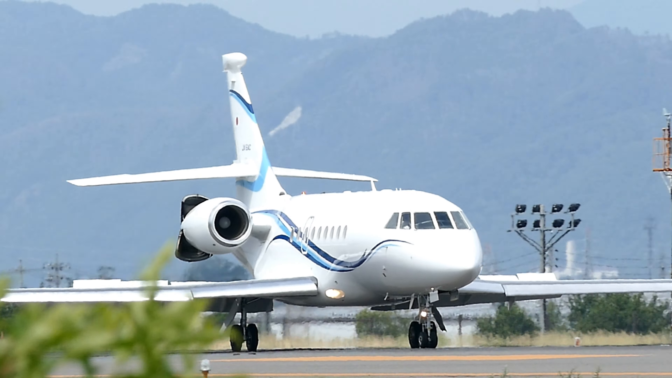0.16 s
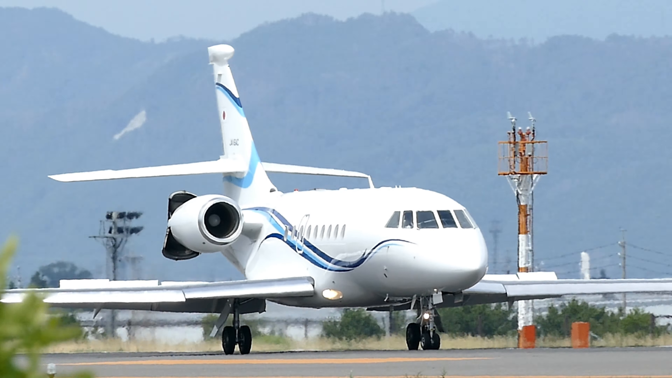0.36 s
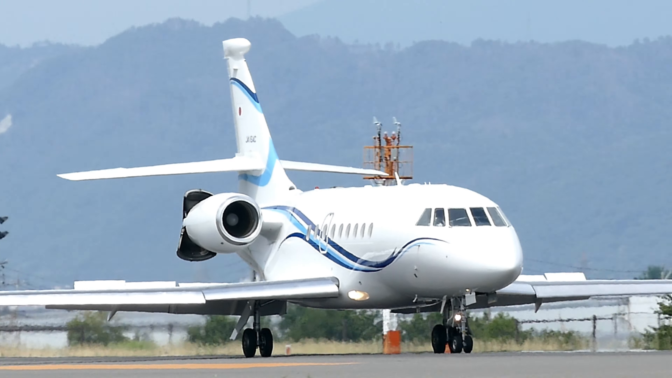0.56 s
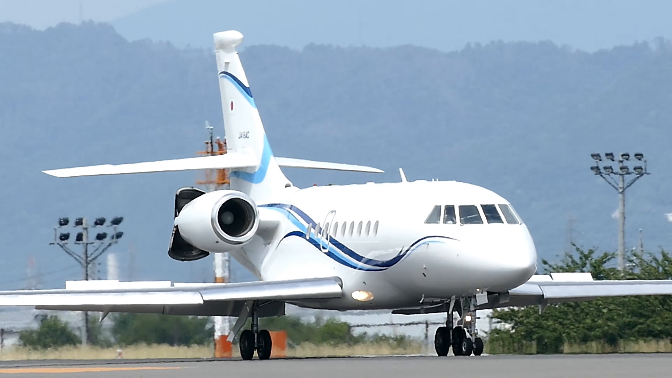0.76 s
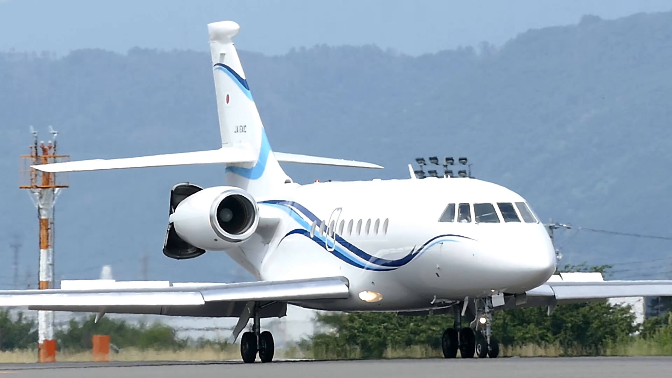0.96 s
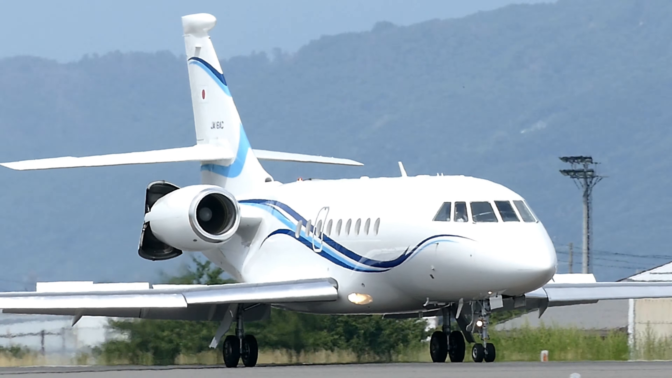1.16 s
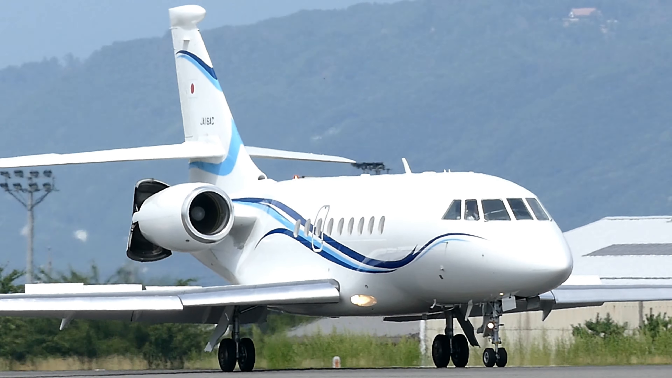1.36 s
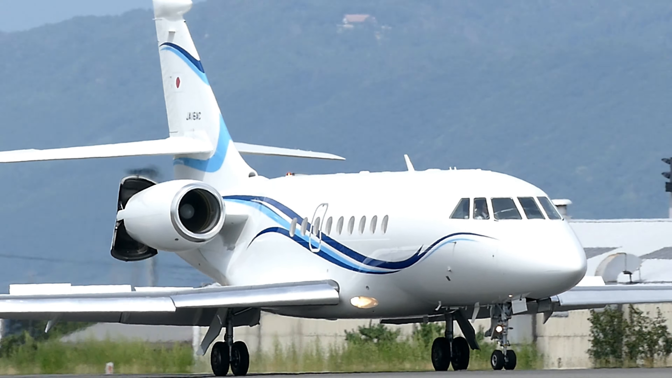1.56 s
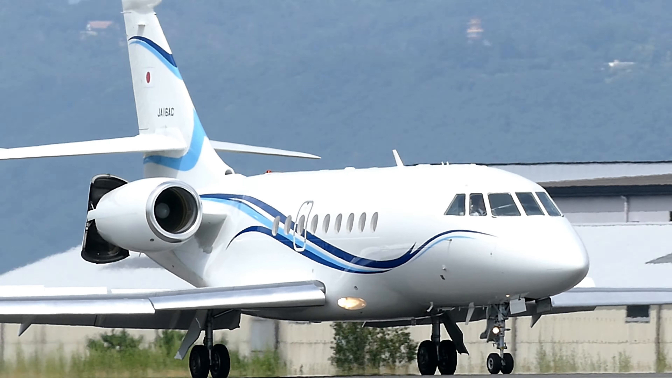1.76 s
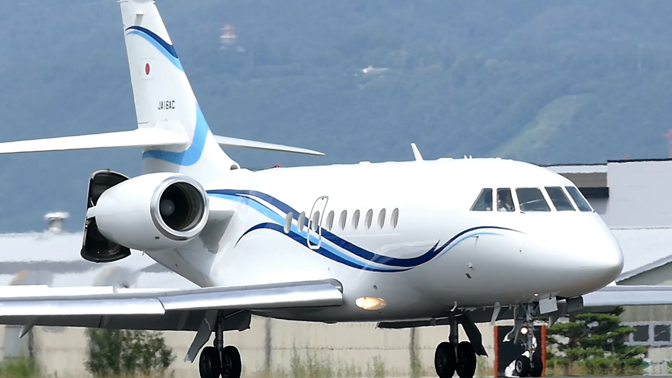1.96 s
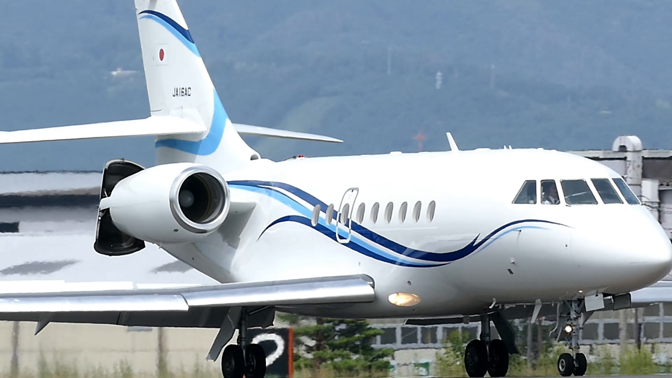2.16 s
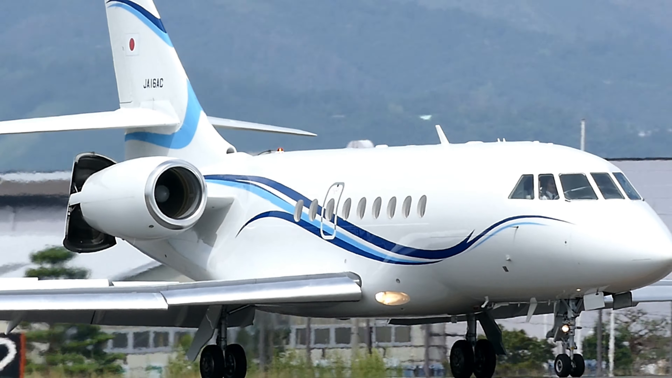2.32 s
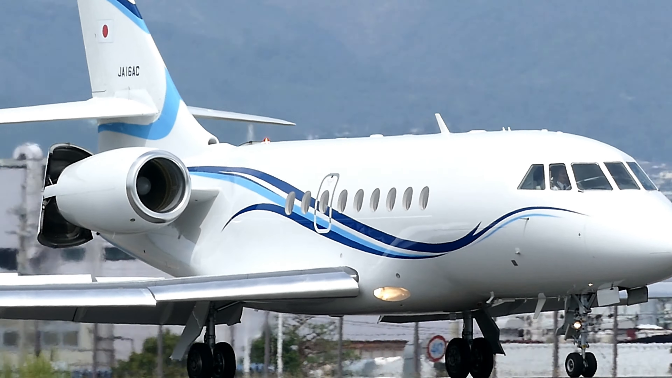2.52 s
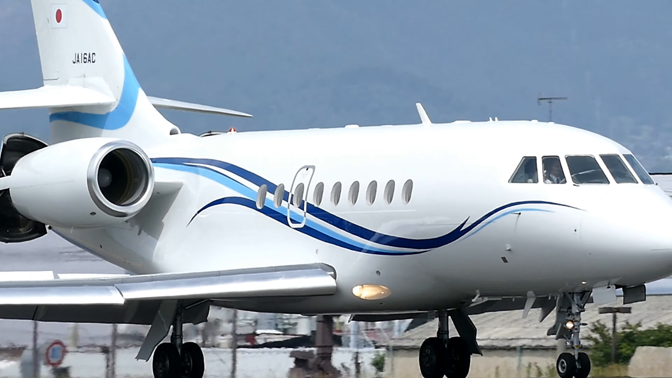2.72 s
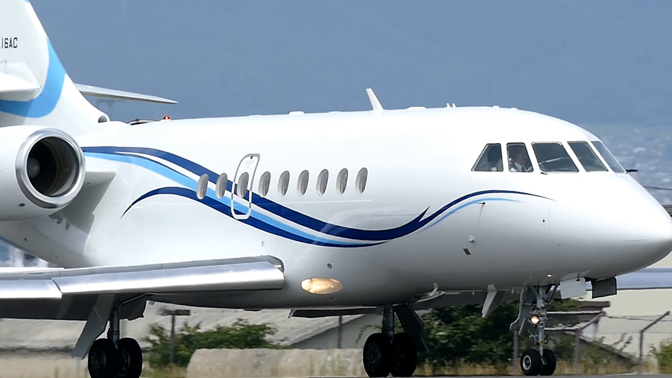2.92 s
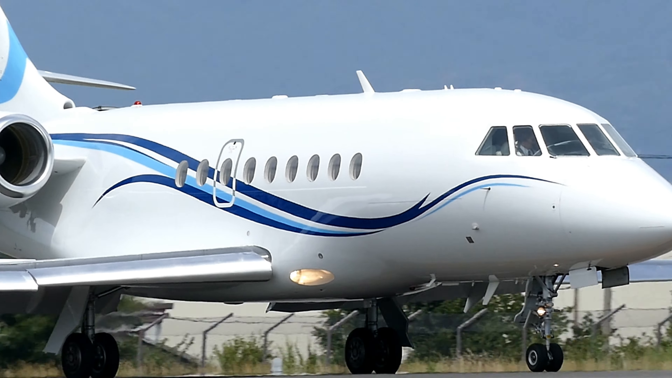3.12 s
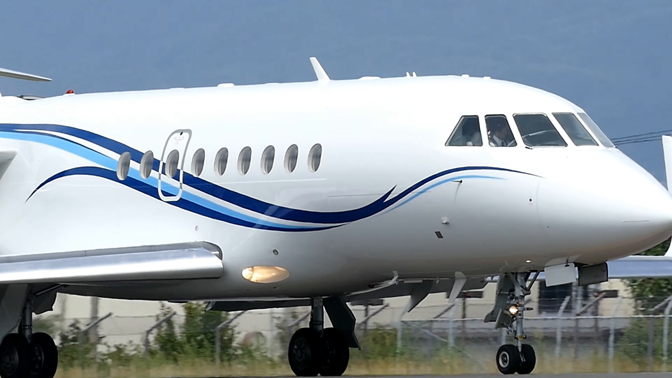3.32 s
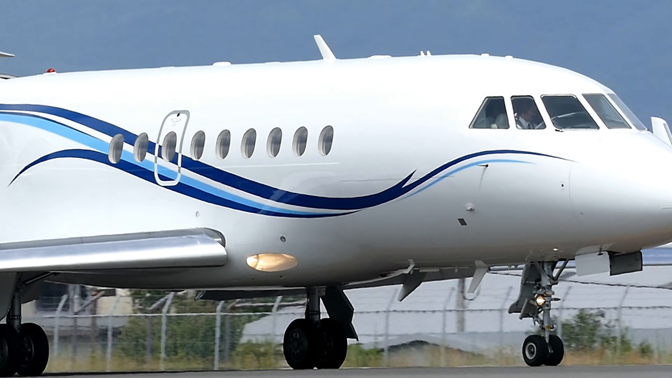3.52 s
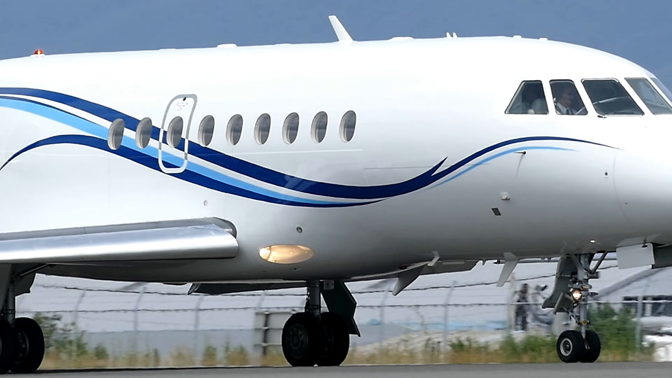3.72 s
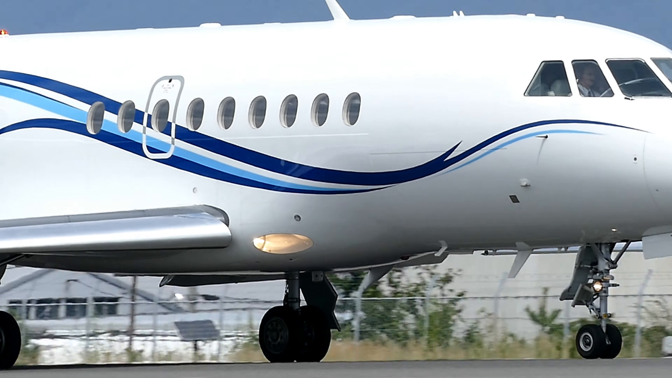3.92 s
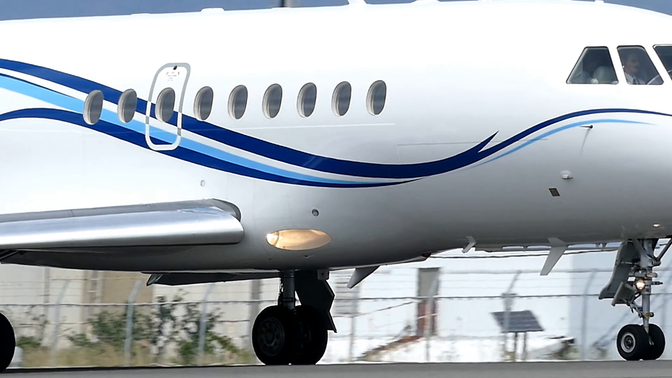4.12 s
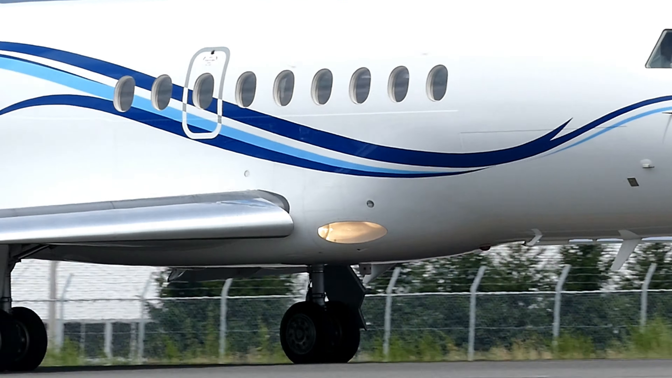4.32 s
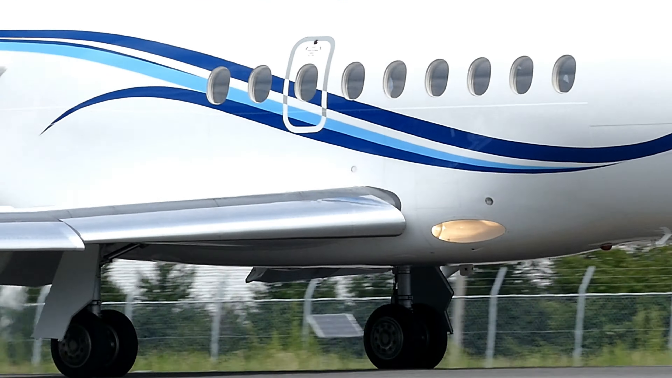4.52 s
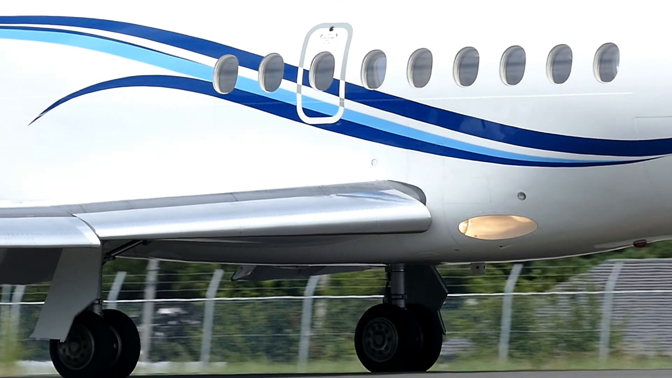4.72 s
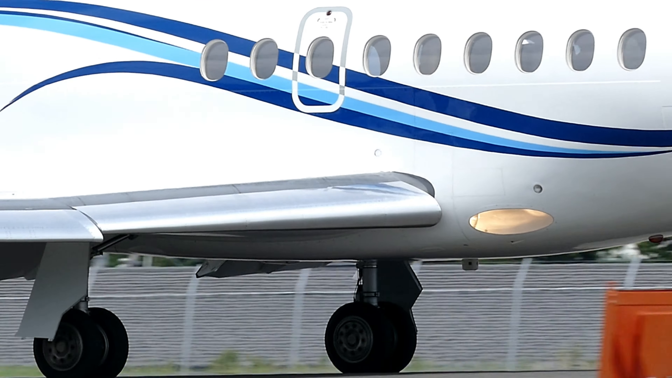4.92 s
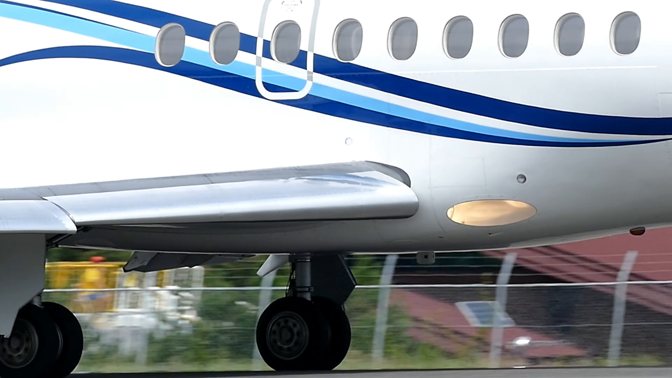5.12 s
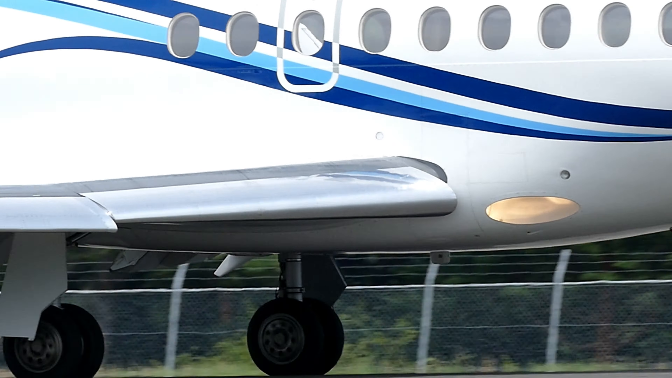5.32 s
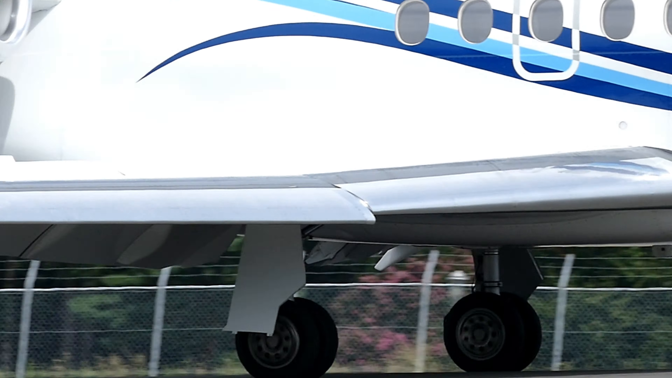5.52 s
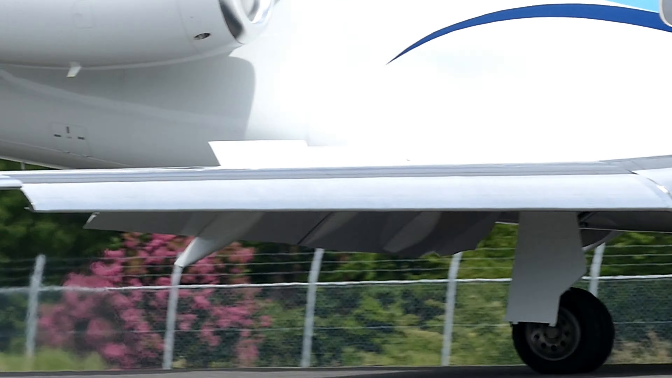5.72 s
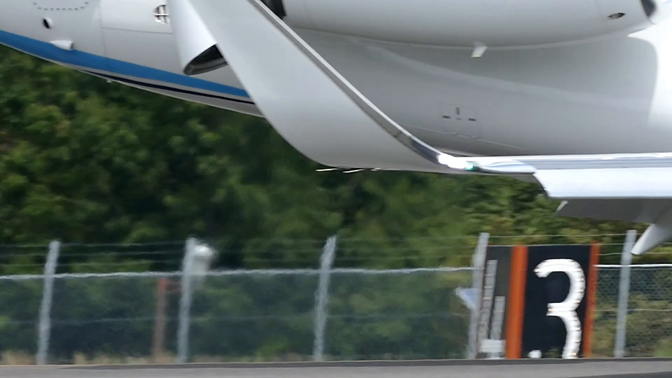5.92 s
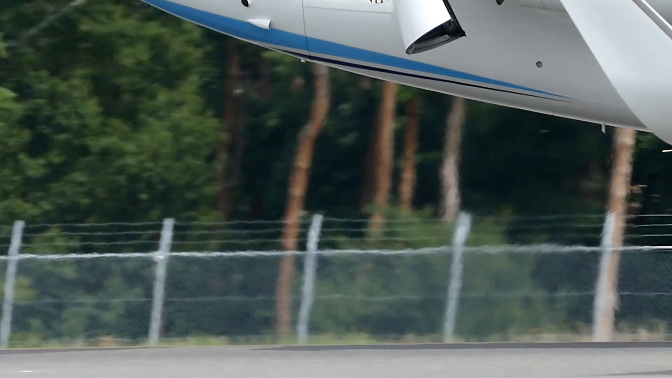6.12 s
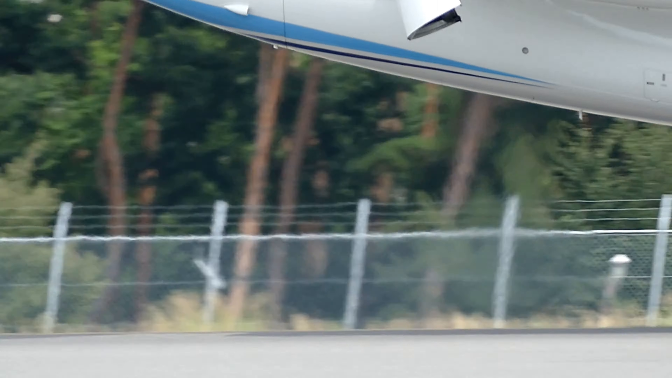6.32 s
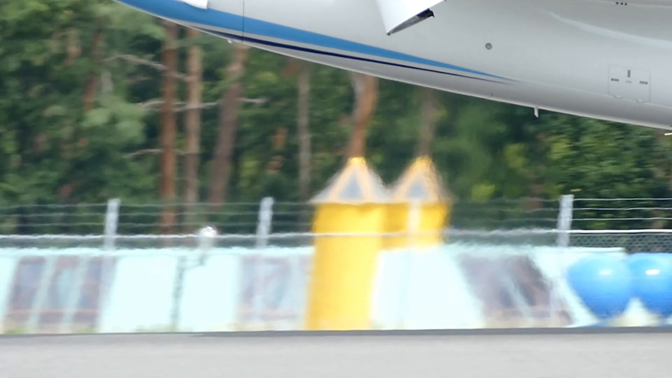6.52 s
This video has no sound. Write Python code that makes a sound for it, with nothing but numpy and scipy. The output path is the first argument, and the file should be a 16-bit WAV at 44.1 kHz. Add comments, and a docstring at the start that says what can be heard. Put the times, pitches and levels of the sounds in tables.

```python
"""First a distant airfield rumble, thin fan tones and a faint bird, heard from beside the runway.
Then the roar of a twin-engine jet, braking with reverse thrust as it rolls towards the camera: its exhaust
is thrown forward and swells in gusts as it nears. Ground and close surfaces echo differently into the two
microphone ports, and the recorder overloads at the loudest swells."""
import sys
import numpy as np
from scipy import signal
from scipy.fft import rfft, irfft, next_fast_len
from scipy.io import wavfile
from scipy.ndimage import uniform_filter1d, map_coordinates

SR = 44100
rng = np.random.default_rng(int(sys.argv[2]) if len(sys.argv) > 2 else 0)


def master(y):
    """Save y as 16-bit WAV."""
    cut = np.clip(np.atleast_2d(y).T, -1, 1)
    pcm = np.round(cut * 32767)  # scale
    wavfile.write(sys.argv[1], SR, pcm.astype(np.int16))


N = 294147
TIME = np.arange(N) / SR


def amp(db):
    """Decibels to gain."""
    return 10 ** (np.asarray(db) / 20)


def unit(x):
    """Scaled to rms 1."""
    return x / np.sqrt(np.mean(x ** 2) + 1e-20)


def gain_at(spectrum, hz):
    """Gain along (f/Hz, level/dB) points on a log frequency axis."""
    f, db = np.transpose(spectrum)
    return amp(np.interp(np.log(hz + 1), np.log(f + 1), db))


def curves(rows):
    """One value per sample for each column after t/s."""
    times, *columns = np.transpose(rows)
    return [np.interp(TIME, times, column) for column in columns]


def bumps(rows, steepness=2.56):
    """Smooth rises in dB around each row's moment, one curve for each column of rises."""
    t = np.arange(0, N / SR, 1 / 500)
    rises = sum(np.outer(db, np.exp(-np.abs((t - at) / half) ** steepness)) for at, half, *db in rows)
    return np.array(curves(np.transpose([t, *rises])))


def wobble(rate):
    """A smooth random curve, rate knots a second."""
    return map_coordinates(rng.standard_normal(int(N * rate / SR) + 4), [TIME * rate])


def filtered(x, response):
    """x times a complex response of frequency."""
    size = next_fast_len(N + 8192)
    return irfft(rfft(x, size) * response(np.fft.rfftfreq(size, 1 / SR)), size)[..., :N]


# Spectrum of the far surroundings: f/Hz, relative level/dB
AIRFIELD_SPECTRUM = [(25, -21), (50, 3), (120, -9), (300, -3.5), (500, -4.5), (1000, -8), (2000, -13.5),
                     (4000, -23), (7000, -32), (16000, -65)]

def airfield():
    """Distant steady rumble, alike at both microphone ports only in the bass."""
    shared, *own = rng.standard_normal((3, N))
    bass_share = lambda hz: 1 / (1 + (hz / 220) ** 4)
    bass = filtered(shared, lambda hz: gain_at(AIRFIELD_SPECTRUM, hz) * np.sqrt(bass_share(hz)))
    rest = filtered(np.array(own), lambda hz: gain_at(AIRFIELD_SPECTRUM, hz) * np.sqrt(1 - bass_share(hz)))
    return amp(-51) * unit(bass + rest) * amp([[.8], [-.8]])


# Notes of a far bird: t/s, f/Hz, length/s, peak level/dB
BIRD_NOTES = [(.39, 3550, .04, -58), (.423, 4200, .025, -61)]

def bird():
    """Short soft notes, barely above the distant noise."""
    return sum(amp(db) * np.exp(-8 * ((TIME - at) / length) ** 2) * np.sin(2 * np.pi * hz * TIME)
               for at, hz, length, db in BIRD_NOTES)


def blade_tones(hz, db, apart_hz, weaker_db, waver_hz, flutter_db, ports_db):
    """One blade tone from each engine; a little apart, they beat, and moving air makes them waver."""
    db = db - 60 * np.clip(TIME - 4.4, 0, 2)  # fades from 4.4 s, as the roar takes over
    pair = 0
    for shift_hz, engine_db in [(0, 0), (apart_hz, weaker_db)]:
        phase = 2 * np.pi * np.cumsum(hz + shift_hz + waver_hz * wobble(30)) / SR
        gain = amp(db + engine_db + flutter_db * wobble(16))
        pair = pair + gain * np.sin(phase + [[0], [1.9]])  # out of step at the two ports
    return np.sqrt(2) * pair * amp(ports_db)


def whine():
    """The engines' higher blade tone, loudest at 3.4 s and fading either side."""
    db = -60 - 5.5 * np.abs(TIME - 3.4)
    return blade_tones(3815, db, apart_hz=-18, weaker_db=-6, waver_hz=12, flutter_db=3, ports_db=[[0], [2]])


# Brief flares of the fan tone at the microphone: t/s, half length/s, rise/dB
FAN_FLARES = [(.14, .06, 6), (.65, .05, 2), (.84, .1, 7), (1.27, 0.11, 8), (1.5, 0.087, 7), (2.42, 0.09, 5),
              (2.9, .15, -1), (3.6, 0.93, 7), (4.3, .4, 10)]

def fan():
    """The fans from down the runway, sinking in pitch and growing louder."""
    hz = 2212 - 89 * TIME
    db = -63 + 1.8 * TIME + bumps(FAN_FLARES)[0]
    return blade_tones(hz, db, apart_hz=24.15, weaker_db=-1.5, waver_hz=6.95, flutter_db=2.3,
                       ports_db=[[1.1], [1.8]])


def turbulence(channels, depth_db):
    """White noise with patches of random gain in time and frequency, as turbulent air lends it."""
    spectra = signal.stft(rng.standard_normal((channels, N)), nperseg=512)[2]
    patches = rng.standard_normal(spectra.shape[1:])
    for axis in (0, 1):
        patches = uniform_filter1d(patches, size=12, axis=axis)
    return signal.istft(spectra * amp(depth_db * unit(patches)), nperseg=512)[1][:, :N]


# Echoes off the ground and surfaces near the microphone, for each place of the jet (far, nearing, abeam),
# left port then right: delay/ms, gain. At grazing angle the ground answers at once, inverted.
PORT_ECHOES = [
    [[(0.0, -0.68), (0.406, -0.039), (0.749, -0.031), (1.12, 0.067), (1.682, 0.046), (1.971, 0.07),
     (2.226, 0.0048), (2.605, -0.046), (3.048, -0.06)], [(0.013, -0.9), (0.495, 0.088), (0.898, 0.11),
     (1.296, -0.01), (1.364, 0.063), (1.911, 0.049), (2.011, -0.019), (2.32, 0.044), (3.28, -0.026)]],
    [[(0.233, 0.56), (0.796, -0.45), (0.978, -0.28), (1.128, 0.081), (1.649, -0.32), (2.001, 0.4),
     (2.556, -0.35), (3.024, -0.29), (3.189, -0.37)], [(0.075, -0.29), (0.392, -0.16), (0.561, 0.16),
     (0.855, 0.2), (1.095, 0.011), (1.977, -0.13), (2.89, -0.2), (3.48, -0.47), (4.099, -0.023)]],
    [[(0.738, -0.355), (0.874, -0.49), (1.101, 0.6), (1.333, -0.38), (1.535, 0.41), (1.692, -0.32),
     (1.934, 0.47), (2.505, -0.48), (3.04, -0.56)], [(0.23, -0.35), (0.36, -0.29), (0.624, 0.14),
     (0.726, 0.14), (1.154, -0.067), (1.721, 0.063), (1.954, -0.088), (3.437, -0.087), (3.599, -0.15)]],
]

def port_responses(place, hz, dull_above_hz=4400):
    """Direct sound plus dull echoes, one response for each microphone port."""
    echoes = [sum(gain * np.exp(-2j * np.pi * hz * ms / 1000) for ms, gain in port)
              for port in PORT_ECHOES[place]]
    return 1 + np.array(echoes) / (1 + (hz / dull_above_hz) ** 4)


# Exhaust spectrum from each place, shaping the sound within a band: f/Hz, relative level/dB
EXHAUST_SPECTRA = [
    [(25, -18), (40, -35), (80, 2.5), (160, 1.2), (400, -8.5), (1000, 3.5), (2000, -17), (3500, -25),
     (6000, -50), (9000, -80), (16000, -99.3)],
    [(25, -9), (40, -13), (80, -4), (160, 0.2), (400, -1.5), (1000, 5.5), (2000, -4), (3500, -18),
     (6000, -31.5), (9000, -45.5), (16000, -100)],
    [(25, -2), (40, -15), (80, 0), (160, 7.5), (400, 8.5), (1000, 3.5), (2000, -1.5), (3500, -17),
     (6000, -28), (9000, -47), (16000, -88)],
]
# Stereo image from each place: scattered level/dB, left over right/dB
STEREO_IMAGE = [(-3.5, 2), (-10.5, 1), (-10.5, -0.5)]
# Edges between the six bands of the exhaust: f/Hz
BAND_EDGES = [140, 320, 750, 1250, 2700]

def exhaust_bands(direct, scattered, place):
    """The exhaust from one place, in bands of mono rms 1; scattered sound differs from port to port."""
    hz = np.fft.rfftfreq(2 * len(direct) - 2, 1 / SR)
    scatter_db, left_db = STEREO_IMAGE[place]
    paths = port_responses(place, hz)
    path_gain = np.sqrt(np.mean(np.abs(paths) ** 2, axis=0) + .002)
    scatter_gain = amp(scatter_db) / np.sqrt(1 + (150 / (hz + 1)) ** 2)  # long waves reach both ports alike
    at_ports = direct * paths + scattered * scatter_gain * path_gain
    heard = at_ports * gain_at(EXHAUST_SPECTRA[place], hz) * amp([[left_db], [0]])
    lowpasses = [0] + [1 / (1 + (hz / edge) ** 10) for edge in BAND_EDGES] + [1]
    bands = [irfft(heard * (upper - lower))[:, :N] for lower, upper in zip(lowpasses, lowpasses[1:])]
    return np.array([band / np.std(band.mean(axis=0)) for band in bands])


# Base levels as the distance closes: t/s, rumble level/dB, roar level/dB, treble over the roar/dB
APPROACH_LEVELS = [(0, -63, -57, 0), (.4, -66, -62, 5), (.9, -50.5, -50.5, -2), (1.6, -43.5, -51, 1.5),
                   (2.3, -44, -49, 0), (2.75, -43.5, -44.5, -0.5), (3.05, -40.5, -42.5, -3.5),
                   (3.32, -43, -38, -5), (3.7, -41, -35, -2.5), (4.05, -38, -35.5, -1),
                   (4.26, -38.5, -29.5, -3), (4.36, -38, -21.5, -7.5), (4.8, -30, -19.5, -5),
                   (5.03, -37, -15.5, -6.5), (5.33, -37, -16.5, -4), (5.55, -32, -18, 0.5),
                   (5.9, -32, -18.5, 2), (6.2, -36.5, -17.5, 3), (6.43, -34.5, -17.5, -0.5),
                   (6.67, -34.5, -16, -5)]
# Surges, mostly of the upper bands: t/s, half length/s, rise of body/dB, of tearing/dB, of hiss/dB
ROAR_SWELLS = [(.88, .12, 3, 1.5, 0.5), (2.75, 0.099, 3.5, -2, 0.5), (4.41, 0.088, -0.5, 2, 4),
               (4.51, 0.052, 7.5, 2.5, 3), (4.7, 0.064, 0.5, 2, 1), (4.91, 0.038, 2, 2, 2.5),
               (5.18, .11, 5.5, 9.5, 8.5), (5.46, 0.022, -5.5, 1, 7), (5.62, .05, 1.5, 5, 5.5),
               (5.72, 0.055, 5, 3, -1), (5.82, .04, -0.5, 4, 4.5), (6.04, 0.035, 4, 2, 0),
               (6.125, 0.039, 4.5, 7, 7), (6.24, 0.052, 2.5, 3.5, 6.5), (6.355, 0.062, 5.5, 5.5, 5.5)]
# Each band, deep to high, takes a share of: roar rather than rumble, treble lift, body, tearing, hiss
BAND_SHARES = [(0, 0.053, 0.051, -.2, 0.17), (.5, 0.1, 0.21, -0.26, 0.12), (1, 0.076, 0, -0.17, 0),
               (1, 0.66, 0.99, -0.042, 0), (1, 1, 0, 1, 0), (0.999, 0.8, 0, 0.016, 1)]

def approach_db():
    """Level of each band as the jet nears and its roar swells."""
    rumble_db, roar_db, treble_db = curves(APPROACH_LEVELS)
    lifts_db = [roar_db - rumble_db, treble_db, *bumps(ROAR_SWELLS)]
    return rumble_db + np.array(BAND_SHARES) @ lifts_db


# The jet's roll along the runway, from the microphone: t/s, place (0 far, 1 nearing, 2 abeam)
RUNWAY_PATH = [(0, 0.0067), (2.9, 0.077), (3.6, 0.83), (5, 1.22), (5.35, 1.67), (6.67, 2.05)]
# Tone balance from each place: offset/dB of each band, deep to high
PLACE_BALANCE = [(0, -1, 0, -4.5, 0, -8), (0, 0.5, 0, -3, 0, -8), (0, -5, 0, -2.5, 0, -8)]

def reverse_thrust():
    """Exhaust thrown forward; the changing bearing turns the echo pattern, gusts shake the treble most."""
    noise = turbulence(channels=3, depth_db=1.48)
    direct, *scattered = rfft(noise, 2 * next_fast_len(N // 2 + 4096))
    position = curves(RUNWAY_PATH)[0]
    crossfades = [np.clip(1 - np.abs(position - place), 0, 1) for place in range(3)]
    bands = sum(fade * exhaust_bands(direct, np.array(scattered), place)
                for place, fade in enumerate(crossfades))
    levels_db = approach_db() + np.transpose(PLACE_BALANCE) @ crossfades
    gusts_db = np.outer([.1, .1, .14, .31, .19, .57], wobble(21))
    return np.sum(amp(levels_db + gusts_db)[:, None] * bands, axis=0)


def scene():
    """Everything that reaches the two microphone ports beside the runway."""
    return fan() + whine() + reverse_thrust() + airfield() + bird()


# Hiss of the microphone preamp: f/Hz, relative level/dB
HISS_SPECTRUM = [(1000, 5), (6000, -5.5), (8000, -5), (12000, 1), (15500, 2)]
# Mains hum in the recorder: f/Hz, rms level/dB
MAINS_HUM = [(60, -76), (120, -69), (299, -68.5), (359, -77)]

def record(dry):
    """The recorder adds preamp hiss and mains hum, overloads hard at full scale and limits the band."""
    shared, *own = rng.standard_normal((3, N))
    hiss = filtered(shared + 1.1 * np.array(own), lambda hz: gain_at(HISS_SPECTRUM, hz))
    hum = sum(np.sqrt(2) * amp(db) * np.sin(2 * np.pi * hz * TIME) for hz, db in MAINS_HUM)
    clipped = np.clip(dry + amp(-59.5) * unit(hiss) + hum, -1, 1)
    return filtered(clipped, lambda hz: hz < 15630)


dry = scene()
out = record(dry)
master(out)
```